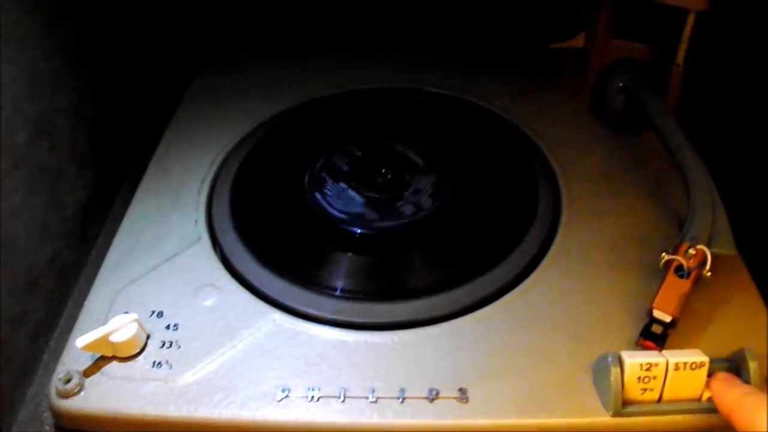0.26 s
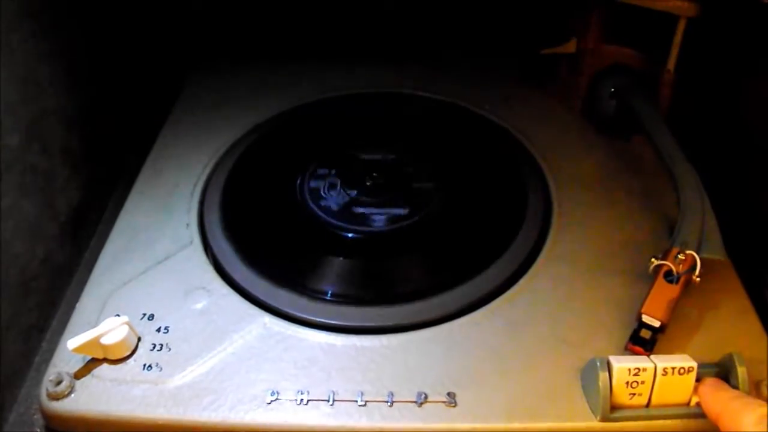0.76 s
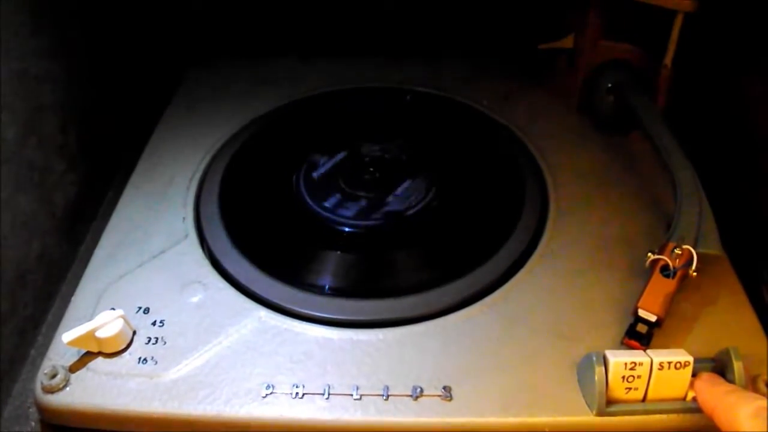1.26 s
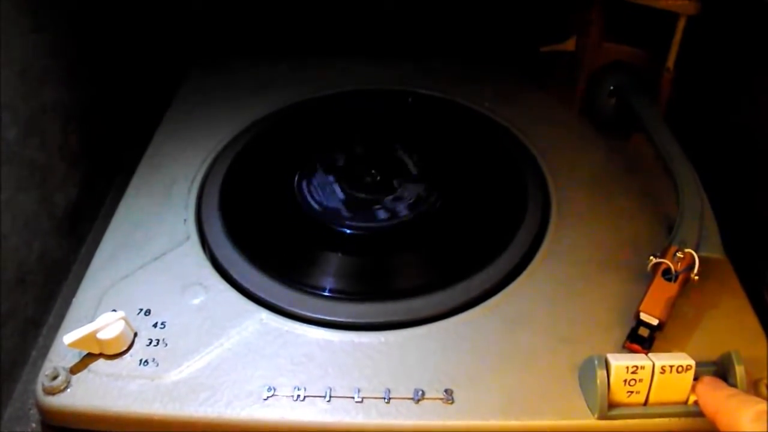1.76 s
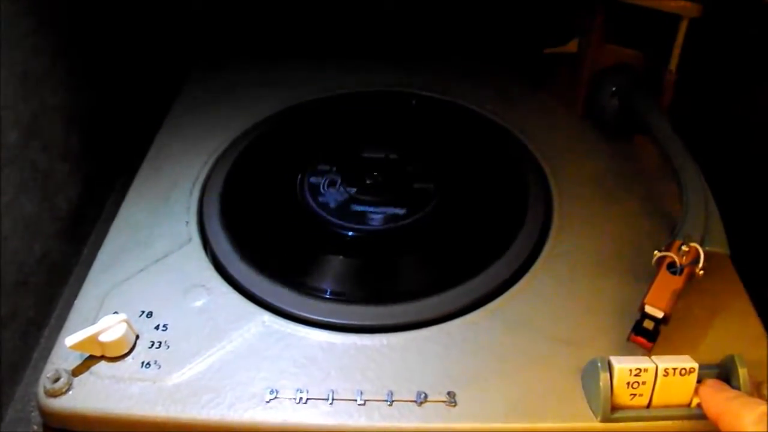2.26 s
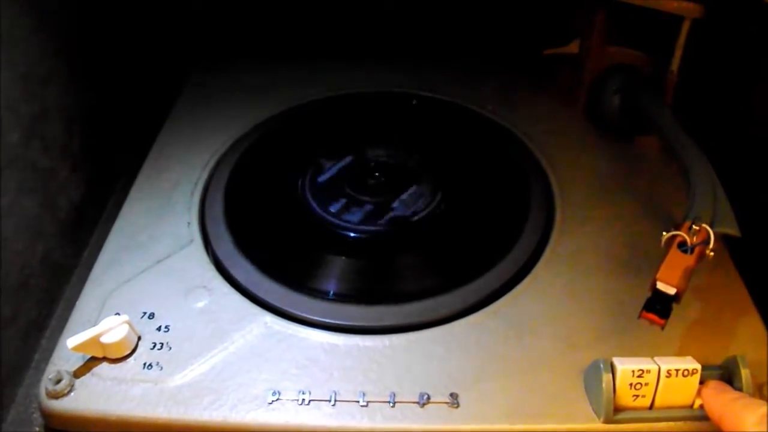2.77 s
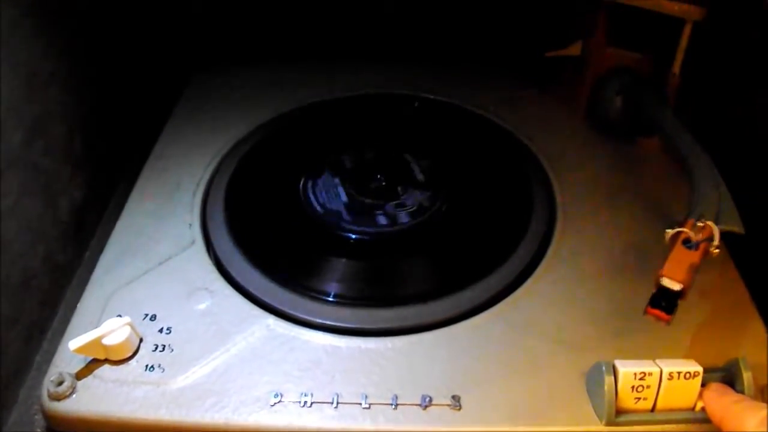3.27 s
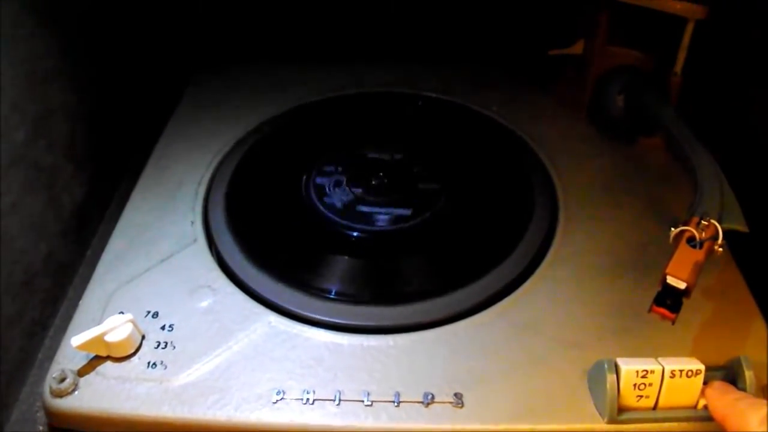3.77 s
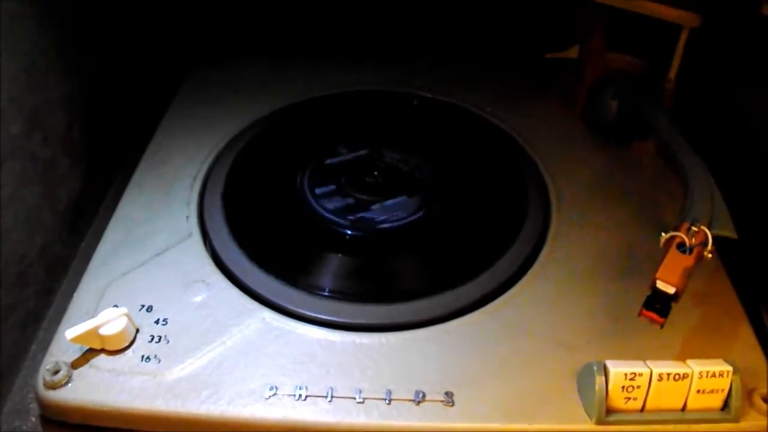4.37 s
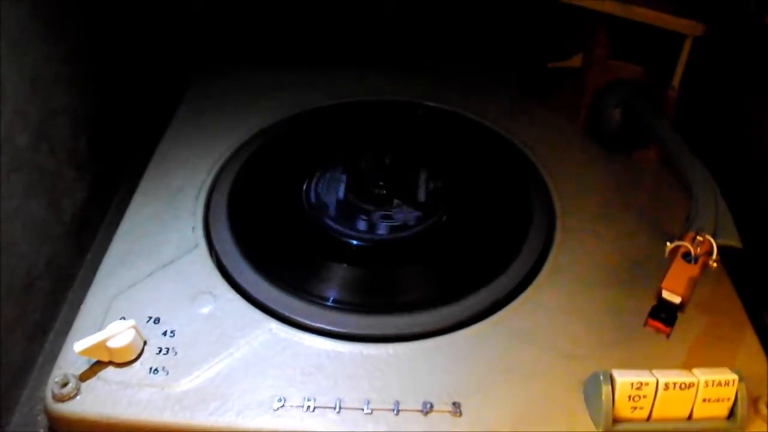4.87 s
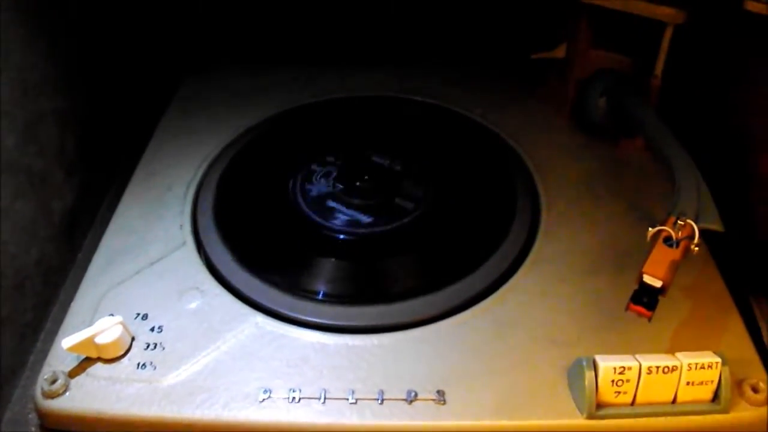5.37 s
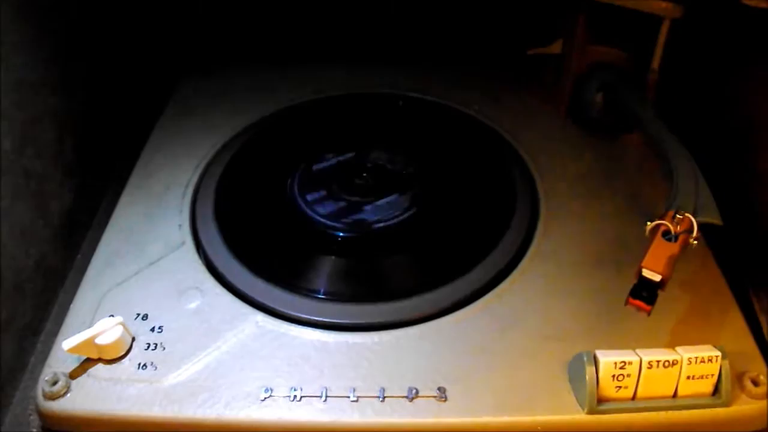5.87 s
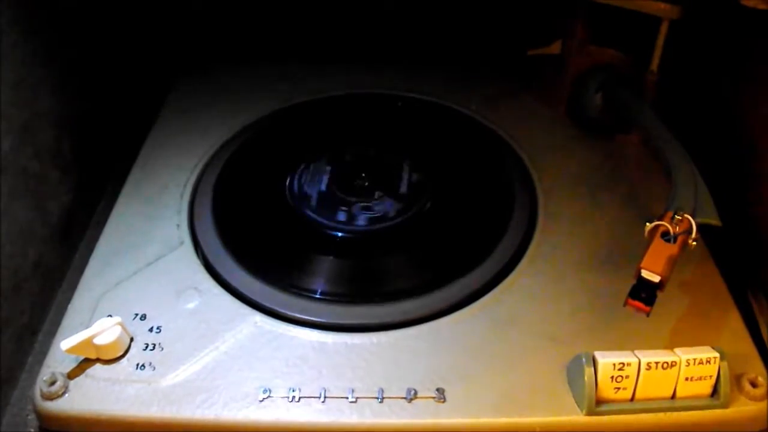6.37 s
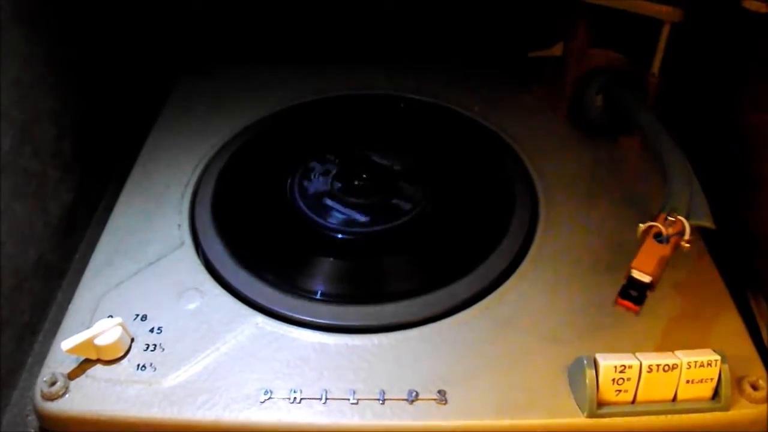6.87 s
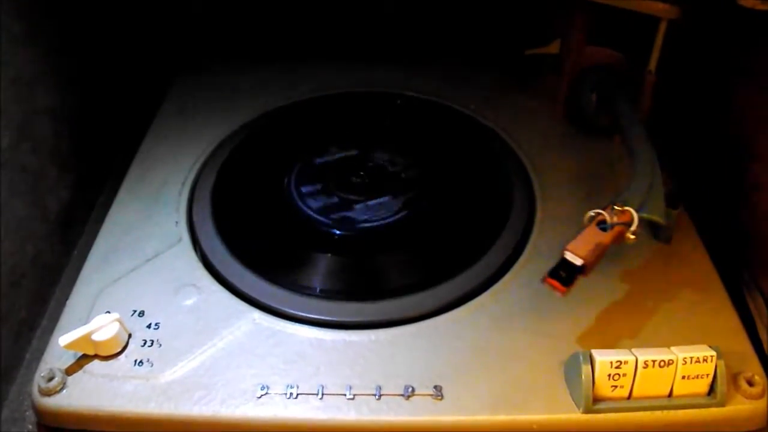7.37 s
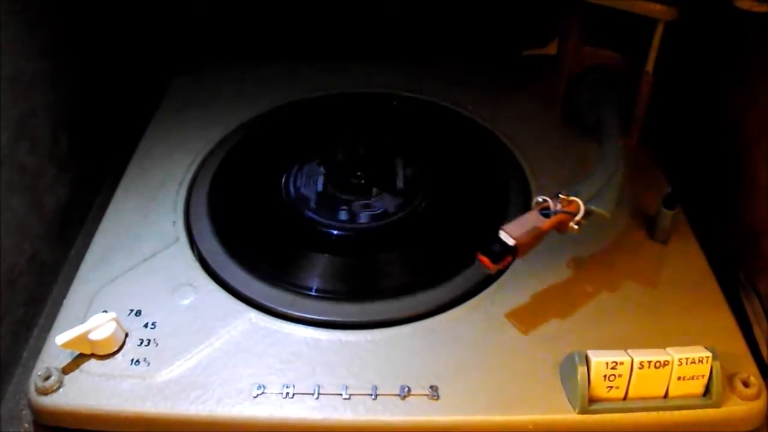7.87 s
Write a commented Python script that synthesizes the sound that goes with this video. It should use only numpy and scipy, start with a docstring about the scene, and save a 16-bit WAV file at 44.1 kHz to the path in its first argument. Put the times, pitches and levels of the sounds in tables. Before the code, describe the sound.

A record changer's motor hums and whines quietly as levers tick and scrape, then two very loud metallic clacks land about a second apart.

```python
"""Record changer, close microphone

A record changer works in a quiet room: levers click, drag and scrape over a humming, whining motor.
Each click is a noisy crack, a set of ringing modes and a cabinet thud, answered by walls and room.
Cam, key and drive are rough contact noise passed through resonances of the parts they touch.
Motor hum and whine are sums of sine tones; low rumble and hiss lie below.
The loudest clicks overload the close microphone's input, and the level ducks briefly."""
import sys
import numpy as np
from scipy import signal
from scipy.fft import rfft, irfft, next_fast_len
from scipy.io import wavfile
from scipy.ndimage import uniform_filter1d, map_coordinates

SR = 44100
rng = np.random.default_rng(int(sys.argv[2]) if len(sys.argv) > 2 else 0)


def persist_wave(psi):
    """Save psi, clipped to +-1, as 16-bit WAV."""
    counts = np.round(np.clip(psi, -1, 1) * 32767).astype(np.int16)
    wavfile.write(sys.argv[1], SR, np.atleast_2d(counts).T)


N = 358091  # samples, about 8.1 s

# contacts of each part: (time [s], ring peak [dB], crack [dB], favoured frequency [Hz])
LATCH_CLICKS = [(2.2465, -37, -55, 1660), (2.2522, -35.5, -58, 3020), (2.968, -45, -62, 3800),
                (3.0812, 2.5, -17, 2730), (3.0836, 1.5, -19.5, 1660), (3.0915, -17, -38, 3000),
                (3.098, -31, -45, 4200), (3.1235, -27, -56, 2900), (3.1565, -39, -56, 2200)]
KEY_CLICKS = [(.3612, -34, -54, 1900), (.3645, -32, -58, 3080), (3.9945, -27, -45, 1500),
              (4.0036, -5, -19.5, 3680), (4.0056, -3, -11.5, 2700), (4.009, -12, -22, 2700),
              (4.019, -14, -50, 3050), (4.0235, -20, -48, 3050), (4.0425, -26, -43, 2600),
              (4.094, -37, -44, 1400)]
PAWL_CLICKS = [(.2845, -35, -54, 1340), (.2903, -20.5, -32, 2250), (.2932, -29, -30, 3000),
               (.3765, -36, -60, 1300), (.383, -38, -47, 3000)]
DETENT_CLICKS = [(3.2675, -21.5, -45, 1700), (3.2722, -18, -35.5, 3130)]
SPRING_CLICKS = [(3.7128, -20, -42, 3600), (3.7146, -13.5, -42, 2470), (3.7172, -26, -44, 2050),
                 (3.7255, -29, -48, 1700), (3.8545, -34.5, -52, 3050)]

# modes of the steel latch, the key with its lever, the light trip pawl, the small detent,
# the spring lever behind the held key, and the wooden cabinet:
# (frequency [Hz], relative level [dB], decay by 60 dB [s])
LATCH_MODES = [(1322, -9.5, 0.07), (1650, -12, 0.016), (1736, -7, 0.039), (2160, -2, 0.035),
               (2190, -29, .19), (2440, 3.5, 0.016), (2500, -32, 0.194), (2764, -10, 0.1),
               (2900, -6, 0.028), (2995, 2, 0.053), (3031, -16.5, 0.13), (3280, -12, 0.04),
               (3591, -27, .12), (3765, -2.5, 0.025), (4130, -1.5, 0.026), (4200, -31, .24),
               (4200, -1, 0.022), (4750, -11, 0.022), (5460, -9, 0.021), (5800, -32, .083),
               (6370, -6, 0.028), (6770, -11, 0.045), (6900, -6, 0.023), (8100, -16, 0.028),
               (8760, -12, .035), (10100, -21, .025), (10460, -40, .15)]
KEY_MODES = [(380, -27, .1), (537, -25.5, 0.17), (715, -23, 0.12), (1249, -23, 0.11), (1555, -15, 0.04),
             (1920, -8.5, 0.045), (2240, -23, 0.08), (2720, 4, 0.026), (3012, -18.5, 0.27),
             (3020, 4, 0.027), (3260, -4, 0.022), (3700, -3, 0.025), (3910, -9, 0.018), (4280, -14, 0.018),
             (4800, -13, 0.02), (5010, -17, 0.022), (5760, -26, .018), (6200, -26.5, 0.014)]
PAWL_MODES = [(1276, -3, 0.051), (1356, 0, 0.02), (2230, -2, 0.035), (2570, -11, .025), (3046, -2, 0.054),
              (6520, -10, .02), (6900, -8, 0.017), (8650, -12, 0.02)]
DETENT_MODES = [(1613, -5, 0.045), (1760, -9, 0.043), (2820, -10, 0.032), (3085, 3, 0.047),
                (3140, -3, 0.04), (3800, -17, .02), (4370, -17, .02)]
SPRING_MODES = [(904, -16, 0.045), (1405, -14, 0.044), (1550, -22, .06), (1720, -10.5, 0.05),
                (2010, -5, 0.038), (2730, -12, 0.054), (2950, 2.5, 0.051), (3220, -17, 0.03),
                (3490, -10, 0.033), (3700, -14, .022), (6800, -20.5, 0.018)]
CABINET_MODES = [(166.5, 1.5, 0.18), (225, -1, 0.17), (277, -3, 0.1), (377, -12, 0.095), (530, -9, 0.097)]
BLUR_HZ = 10.7  # the parts sit loosely, which blurs every mode by this much
THUD_FOLLOWS = 0.29  # dB of cabinet thud per dB of click

# crack of bare steel, of the duller key, and of the small levers under the deck:
# (frequency [Hz], relative density [dB per Hz])
STEEL_CRACK = [(100, -3), (550, -6), (1300, 2), (3000, 6), (5200, -6), (7000, -2), (9200, 1), (12000, -15),
               (15500, -34)]
KEY_CRACK = [(100, 1), (600, -23), (1500, 8), (3500, 11), (5000, 1), (7200, -13), (9000, -4), (11000, -20),
             (15500, -16)]
LEVER_CRACK = [(100, 1), (500, -4), (950, 3), (2300, -10), (3600, 7), (5000, 1), (7200, -20), (9500, -8),
               (15500, -30)]

# dull knocks of the cam in the cabinet: (time [s], level [dB])
KNOCKS = [(0.696, -41.5), (1.724, -42), (2.2483, -43), (3.267, -43), (6.745, -48)]
# reflections off the deck and the cabinet walls: (delay [s], level [dB])
WALLS = [(.0037, -26.5), (.0079, -17), (0.01, -33), (0.017, -22)]
# dying away of the room: (frequency [Hz], decay by 60 dB [s])
ROOM_DECAY = [(150, 0.32), (1000, 0.24), (3000, 0.42), (7000, 0.21), (14000, 0.13)]
# loose parts under the deck: (frequency [Hz], relative density [dB per Hz])
RATTLE = [(80, -12), (160, -13), (290, -6), (420, -3), (540, -1), (720, 1), (1000, 0), (1280, 0),
          (1700, -9), (4000, -48)]

# strokes of the cam and the key levers: (start [s], length [s], level [dB])
STROKES = [(0.304, 0.39, -48), (0.63, 0.063, -60), (0.744, 1.66, -60), (1.773, 0.26, -70),
           (3.202, 0.06, -49), (4, 0.09, -51), (4.1, 0.52, -59.5)]
STROKE_ATTACK_S, STROKE_RELEASE_S, STROKE_RISE_DB_PER_S = 0.025, 0.033, 0.5
# the cam catches hard and breaks free: (time [s], level [dB])
CATCHES = [(.3273, -48), (.361, -44), (0.376, -43), (.384, -45), (.416, -49), (.459, -50), (.477, -55),
           (.502, -51), (.519, -53), (.5593, -51), (.581, -53), (.6421, -48), (.658, -51), (.69, -52),
           (.708, -50), (3.207, -44), (3.246, -47)]
CATCH_S = 0.0079  # time constant of a catch
# resonances of the levers: (frequency [Hz], width [Hz], relative level [dB])
LEVERS = [(236, 30, 7.5), (555, 30, 4), (707, 28, 3.5), (890, 61, -1), (1260, 79, 5), (1690, 550, -0.5),
          (2130, 250, 1), (2960, 340, 3.5), (4120, 180, -8)]
LEVERS_TOP_HZ = 5200  # the heavy levers pass little above this
SLIPS_PER_S, RUB_DB = 800, -1  # tiny catches in a stroke; level of the smooth rubbing noise [dB]
# fine grit on the face of the cam: (frequency [Hz], relative density [dB per Hz])
GRIT = [(1500, -30), (4000, 6), (6000, -0.5), (7800, -5), (9600, -1), (12000, -12), (15500, -22)]
GRIT_PER_S, GRIT_DB = 4000, -13.5  # grains a second; their level against the stroke

# the idler wheel briefly makes single resonances of the deck sing:
# (start [s], length [s], frequency [Hz], level [dB])
SINGS = [(.86, .11, 1310, -59), (.86, .11, 1570, -58), (1.003, 0.14, 1320, -54), (1.2, .08, 1560, -57),
         (1.77, .13, 1316, -54), (4.51, 0.077, 1565, -54)]
# resonances of the deck under the rolling drive: (frequency [Hz], width [Hz], relative level [dB])
DECK = [(923, 210, -8), (1301, 51, -0.5), (1532, 58, 3.5), (1770, 140, -2.5), (2210, 340, -7),
        (2780, 286, 0), (3077, 306, -1), (3666, 320, -9.5), (4270, 256, -11)]
# the turning platter and the room: (frequency [Hz], relative density [dB per Hz])
RUMBLE = [(20, -5.5), (35, 0.5), (48, -0.5), (70, -7), (130, -13), (175, -12), (220, -11), (300, -19.5),
          (450, -23), (700, -25), (1500, -26.5), (4000, -62)]
RUSTLE_DB, RUMBLE_DB, HISS_DB = -52.5, -50, -61.5

MAINS_HZ = 50
# hum of the motor's iron: (multiple of the mains, relative level [dB])
HUM = [(1, -21), (2, 0), (4, -9.5), (26, -20), (30, -36), (32, -19)]
# the hum swells and ebbs slowly: (time [s], level [dB])
HUM_LEVEL = [(.02, -45), (.18, -51), (.36, -44.5), (1.4, -45.5), (2.3, -44), (3.2, -45), (3.9, -44.5),
             (4.55, -45), (4.75, -48.5), (5.3, -48.5), (6.0, -44.5), (6.55, -45), (6.72, -50), (7.1, -47.5),
             (7.35, -45), (7.8, -49.5)]
# the rotor runs up, then slows wherever the cam loads it:
# (time [s], slot pitch [Hz], whine [dB], first sideband below [dB])
ROTOR = [(0, 735, -62, -75), (.028, 840, -62, -72), (.043, 925, -56, -70), (.07, 945, -64, -65),
         (.09, 970, -59, -59), (.125, 1000, -56, -66), (.22, 1009, -56, -59), (.7, 1007, -54.5, -56.5),
         (.78, 998, -63, -66), (.9, 992, -72, -68), (1.3, 999, -62, -67), (1.68, 998, -57, -59),
         (1.93, 988, -66, -66), (2.1, 990, -61, -63), (2.7, 991.5, -56.5, -62), (3.5, 995, -60, -63),
         (4, 993, -59.5, -62), (4.35, 993, -55.5, -57.5), (4.46, 990, -58, -59), (4.55, 986.5, -58, -72),
         (4.95, 988, -56, -66), (5.25, 987, -59, -65), (5.42, 992, -56.5, -59), (5.75, 997, -52.5, -57.5),
         (6.34, 999, -51.5, -60), (6.42, 987, -63, -64), (6.62, 984, -64, -74), (6.92, 989, -62, -66),
         (7.03, 993, -57, -63), (7.44, 992, -59, -62), (7.55, 987.5, -60.5, -73), (8.12, 989, -60, -67)]
# the field pulses at twice the mains rate and puts sidebands on the whine; each is loudest at the
# speed that sets it on a resonance of the deck:
# (steps of twice the mains from the whine, peak level [dB], slot pitch at the peak [Hz], width [Hz])
SIDEBANDS = [(-3, -82, 988, 20), (-2, -67.5, 986.5, 6), (1, -68, 1000, 24), (2, -68.5, 1000, 24),
             (8, -68, 992, 20), (9, -68.5, 1002, 24)]

# microphone hiss: (frequency [Hz], relative density [dB per Hz])
HISS = [(100, 13.5), (4000, -2), (5800, 2), (8000, -0.5), (10000, 1.5), (12500, -0.5), (15500, -2)]
# the gain ducks when the input passes a share of full scale, then creeps back
DUCK_ABOVE, DUCK_DB, GAIN_SMOOTHING_S, RECOVER_DB_PER_S = 0.72, 5, 0.025, 54
TOP_HZ = 15760


def amp(db):
    """Decibels to amplitude."""
    return 10 ** (np.asarray(db) / 20)


def unit(x):
    """x at rms 1."""
    return x / np.sqrt(np.mean(x ** 2) + 1e-20)


def along(points, hz):
    """Values between (frequency [Hz], value) points on a log axis."""
    f, v = np.transpose(points)
    return np.interp(np.log(hz + 1), np.log(f + 1), v)


def curves(rows):
    """One value per sample for each column after the time."""
    s, *cols = np.transpose(rows)
    return [np.interp(np.arange(N) / SR, s, c) for c in cols]


def wobble(rate):
    """A smooth random curve, rate knots a second."""
    coarse = np.arange(0, N + 16, 16)
    curve = map_coordinates(rng.standard_normal(len(coarse)), [coarse * rate / SR])
    return np.interp(np.arange(N), coarse, curve)


def filtered(x, response):
    """x times a response of frequency."""
    n = x.shape[-1]
    m = next_fast_len(n + SR // 4)
    return irfft(rfft(x, m) * response(np.fft.rfftfreq(m, 1 / SR)), m)[..., :n]


def noise(spectrum, size=N):
    """Coloured noise of rms 1."""
    return unit(filtered(rng.standard_normal(size), lambda hz: amp(along(spectrum, hz))))


def slips(per_s):
    """Tiny catches at random moments with random signs, mostly weak."""
    happens = rng.random(N) < per_s / SR
    return unit(happens * rng.choice([-1, 1], N) * rng.uniform(size=N) ** 2)


def resonate(x, peaks, wander_db, rate):
    """x through a set of resonances, at rms 1; each waxes and wanes as the point of contact moves."""
    out = np.zeros(N)
    for k, (c, w, db) in enumerate(peaks):
        band = filtered(x, lambda f: 1j * f * w / (c * c - f * f + 1j * f * w))
        out += (-1) ** k * amp(db + wander_db * wobble(rate)) * band
    return unit(out)


def ring(modes, t, favoured_hz, scatter_db, attack, early_db, early_s):
    """Damped modes, peak 1; the spot that is struck favours those near one frequency."""
    hz, db, t60 = np.transpose(modes)[:, :, None]
    favour_db = 7 * np.exp(-(np.log2(hz / favoured_hz) / 0.16) ** 2)
    strength_db = db + favour_db + scatter_db * rng.standard_normal(hz.shape)
    # a random walk of the phase blurs each mode
    steps = rng.standard_normal((len(hz), len(t))) * np.sqrt(2 * np.pi * BLUR_HZ / SR)
    drift = uniform_filter1d(np.cumsum(steps, axis=1), size=64, axis=1)
    x = np.sum(amp(strength_db - 60 * t / t60) * np.sin(2 * np.pi * hz * t + drift), axis=0)
    # early_db lifts the first moment, or holds it back if negative
    x = x * (1 - np.exp(-t / attack)) * amp(early_db * np.exp(-(t / early_s) ** 2))
    return x / np.abs(x).max()


def thud(t):
    """One low ring of the cabinet, peak 1."""
    return ring(CABINET_MODES, t, favoured_hz=280, scatter_db=4.0, attack=0.0049, early_db=4, early_s=0.0056)


def clicks(contacts, modes, crack_spectrum, crack_t60, thud_db, attack, early_db, early_s):
    """Each contact cracks, rings its part and thuds in the cabinet."""
    out, t = np.zeros(N + SR), np.arange(SR // 3) / SR
    for s, ring_db, crack_db, favoured_hz in contacts:
        tone = ring(modes, t, favoured_hz, scatter_db=1.4, attack=attack, early_db=early_db, early_s=early_s)
        crack = amp(crack_db - 60 * t / crack_t60) * noise(crack_spectrum, size=len(t))
        body = amp(thud_db + THUD_FOLLOWS * ring_db) * thud(t)
        out[round(s * SR):][:len(t)] += amp(ring_db) * tone + crack + body
    return out[:N]


def latch():
    """The steel latch snaps over: a bright crack and a ring that is loudest at first."""
    return clicks(LATCH_CLICKS, LATCH_MODES, STEEL_CRACK, crack_t60=0.035, thud_db=-42.5,
                  attack=0.0011, early_db=7.5, early_s=0.0039)


def keys():
    """The key and its lever strike with a duller crack and ring."""
    return clicks(KEY_CLICKS, KEY_MODES, KEY_CRACK, crack_t60=0.016, thud_db=-37,
                  attack=0.00096, early_db=5.0, early_s=0.0055)


def pawl():
    """The light pawl trips: a steel crack and a ring held back in its first moment."""
    return clicks(PAWL_CLICKS, PAWL_MODES, STEEL_CRACK, crack_t60=0.026, thud_db=-38,
                  attack=0.00089, early_db=-6.0, early_s=0.0035)


def spring_lever():
    """The spring lever behind the held key ticks, ringing its own modes."""
    return clicks(SPRING_CLICKS, SPRING_MODES, LEVER_CRACK, crack_t60=0.018, thud_db=-41.0,
                  attack=0.0011, early_db=4.5, early_s=0.0073)


def detent():
    """The small detent ticks with a dull crack and a short ring."""
    return clicks(DETENT_CLICKS, DETENT_MODES, LEVER_CRACK, crack_t60=0.04, thud_db=-40,
                  attack=0.001, early_db=0.5, early_s=0.005)


def knocks():
    """The cam bumps the cabinet, which rings low without a click."""
    out, t = np.zeros(N + SR), np.arange(SR // 3) / SR
    for s, db in KNOCKS:
        out[round(s * SR):][:len(t)] += amp(db) * thud(t)
    return out[:N]


def room(x, tail_db):
    """Near walls throw back short copies, and the room dies away at its own pace in each band."""
    near = filtered(x, lambda f: 1 + sum(amp(db) * np.exp(-2j * np.pi * f * delay) for delay, db in WALLS))
    hz, t, z = signal.stft(rng.standard_normal(SR // 2), SR, nperseg=256)
    decay = amp(-60 * t / along(ROOM_DECAY, hz)[:, None])
    tail = signal.istft(z * decay, SR, nperseg=256)[1]
    return near + amp(tail_db) * signal.fftconvolve(x, tail / np.linalg.norm(tail))[:N]


def rattle(start_s, spectrum, level_db, t60):
    """A hard blow jolts the deck, whose loose parts chatter briefly."""
    t = np.maximum(np.arange(N) / SR - start_s, 0)
    chatter = unit(noise(spectrum) * amp(2.97 * wobble(150)))
    return amp(level_db - 60 * t / t60) * (1 - np.exp(-t / 0.0037)) * chatter


def key_drag(start_s, end_s, level_db):
    """As the finger eases off, the key drags ever faster in its guide and excites its own modes."""
    t = np.arange(N) / SR
    speed = np.clip((t - start_s) / (end_s - start_s), 0, 1) * (t < end_s)
    grit = rng.standard_normal(N) * amp(3.3 * wobble(180))
    # a mode's width follows from its decay
    peaks = [(hz, np.log(1000) / np.pi / t60, db) for hz, db, t60 in KEY_MODES]
    return amp(level_db) * speed * resonate(grit, peaks, wander_db=1.5, rate=27)


def cam():
    """In each stroke the cam rubs along its levers in tiny gritty slips, and now and then catches hard."""
    pressure, catches = np.zeros(N), np.zeros(N)
    for s, length, db in STROKES:
        t = np.maximum(np.arange(N) / SR - s, 0)
        attack = np.minimum(t / STROKE_ATTACK_S, 1)
        release = np.exp(-np.maximum(t - length, 0) / STROKE_RELEASE_S)
        pressure += amp(db + STROKE_RISE_DB_PER_S * t) * attack * release
    t = np.arange(SR // 10) / SR
    for s, db in CATCHES:
        catches[round(s * SR):][:len(t)] += amp(db) * np.exp(-t / CATCH_S)
    rub = rng.standard_normal(N) * amp(RUB_DB + 1.6 * wobble(60))
    contact = filtered(slips(SLIPS_PER_S) + rub, lambda hz: 1 / (1 + (hz / LEVERS_TOP_HZ) ** 4))
    scrape = (pressure + catches) * resonate(contact, LEVERS, wander_db=2.5, rate=41)
    grit = unit(filtered(slips(GRIT_PER_S), lambda hz: amp(along(GRIT, hz))))
    return scrape + amp(GRIT_DB) * pressure * grit


def singing(waver_hz):
    """Each brief song of the deck swells and fades on an unsteady pitch."""
    t, out = np.arange(N) / SR, np.zeros(N)
    for s, length, hz, db in SINGS:
        swell = np.sin(np.pi * np.clip((t - s) / length, 0, 1)) ** 2
        turns = np.cumsum(hz + waver_hz * wobble(90)) / SR
        out += amp(db) * swell * np.sqrt(2) * np.sin(2 * np.pi * turns)
    return out


def motor():
    """The rotor runs up and whines, with sidebands that follow its speed, over the mains hum."""
    t = np.arange(N) / SR

    def tone(turns):
        """A sine of rms 1 from a random phase."""
        return np.sqrt(2) * np.sin(2 * np.pi * (turns + rng.random()))

    hum_db, = curves(HUM_LEVEL)
    hum = sum(amp(db + 1.06 * wobble(7)) * tone(round(k) * MAINS_HZ * t) for k, db in HUM)
    pitch, whine_db, below_db = curves(ROTOR)
    pitch = pitch + 0.61 * wobble(13)
    slots = np.cumsum(pitch) / SR
    pulses = 2 * MAINS_HZ * t
    whine = amp(whine_db + 0.89 * wobble(9) + 0.96 * wobble(45)) * tone(slots)
    below = amp(below_db + 1.7 * wobble(7.6)) * tone(slots - pulses)
    sidebands = np.zeros(N)
    for k, db, peak_hz, width_hz in SIDEBANDS:
        resonance = 1 / (1 + ((pitch - peak_hz) / width_hz) ** 2)
        sidebands += amp(db + 1.9 * wobble(5)) * resonance * tone(slots + round(k) * pulses)
    return amp(hum_db) * hum + whine + below + sidebands


def drive():
    """The idler wheel rolls on the platter rim: a rustle in the deck over a low rumble."""
    rolling = rng.standard_normal(N) * amp(0.77 * wobble(150) + 0.37 * wobble(6.9))
    rustle = amp(RUSTLE_DB) * resonate(rolling, DECK, wander_db=0.82, rate=14)
    rumble = amp(RUMBLE_DB + 0.99 * wobble(3.944)) * noise(RUMBLE)
    return rustle + rumble


def hiss():
    """The microphone's own steady coloured noise."""
    return amp(HISS_DB) * noise(HISS)


def scene():
    """The parts of the changer click in the room over the running motor and drive."""
    small_parts = keys() + detent() + spring_lever() + knocks()
    mechanism = room(latch(), tail_db=-24.0) + room(pawl(), tail_db=-22) + room(small_parts, tail_db=-23.5)
    latch_chatter = rattle(3.083, STEEL_CRACK, level_db=-34, t60=0.16)
    drag = key_drag(start_s=3.79, end_s=4.004, level_db=-44.5)
    release_chatter = rattle(4.005, RATTLE, level_db=-35.0, t60=0.29)
    moving = mechanism + latch_chatter + drag + release_chatter + cam()
    mono = moving + singing(waver_hz=30) + motor() + drive() + hiss()
    return np.array([mono, mono])


def record(dry):
    """The input clips and ducks the gain; the left channel lags by one sample, and the top is cut off."""
    hardness = 12  # a high power keeps the curve straight until close to full scale
    clipped = dry / (1 + np.abs(dry) ** hardness) ** (1 / hardness)
    # each overload sets the duck, which then falls back at a steady rate
    recovery_db = RECOVER_DB_PER_S * np.arange(N) / SR
    overload_db = DUCK_DB * (np.abs(dry[0]) > DUCK_ABOVE)
    duck_db = np.maximum.accumulate(overload_db + recovery_db) - recovery_db
    keep = np.exp(-1 / (GAIN_SMOOTHING_S * SR))
    left, right = clipped * amp(-signal.lfilter([1 - keep], [1, -keep], duck_db))
    pair = np.array([np.concatenate([[0], left[:-1]]), right])
    return filtered(pair, lambda hz: hz < TOP_HZ)


dry = scene()
out = record(dry)
persist_wave(out)
```